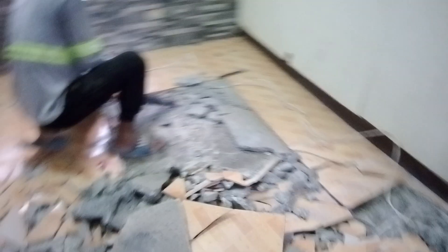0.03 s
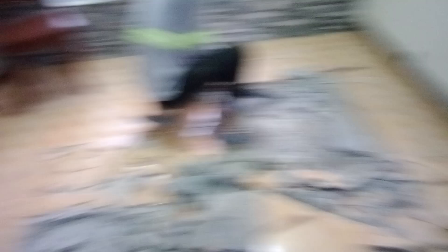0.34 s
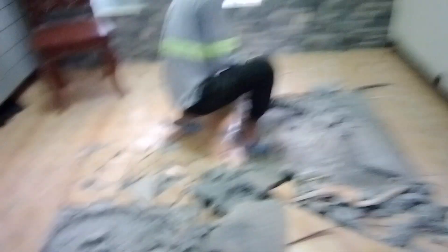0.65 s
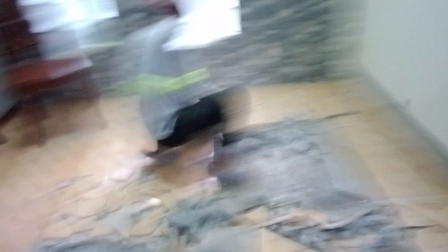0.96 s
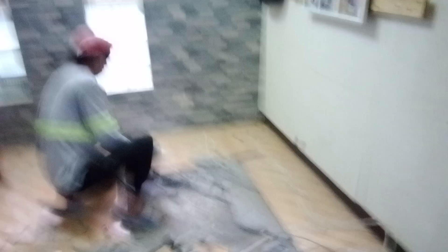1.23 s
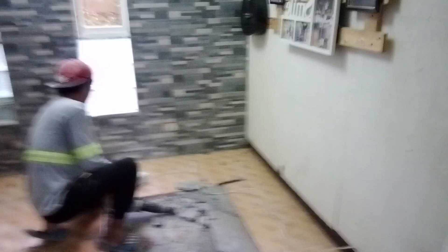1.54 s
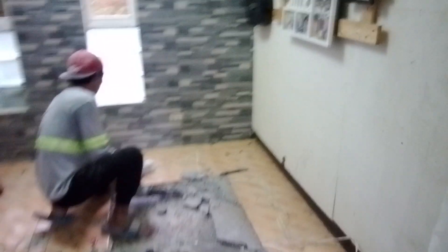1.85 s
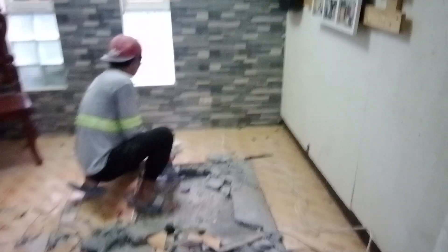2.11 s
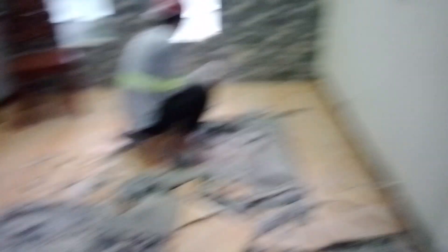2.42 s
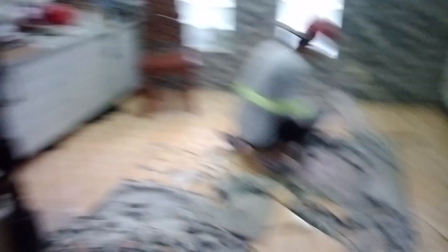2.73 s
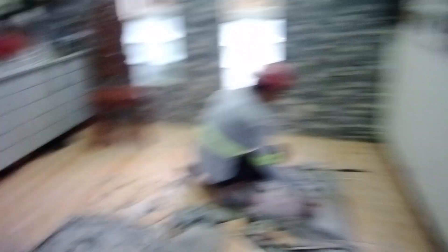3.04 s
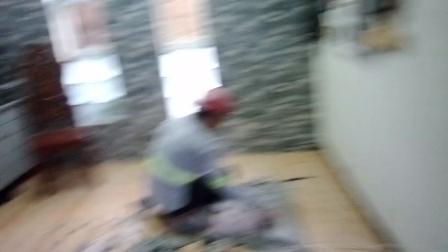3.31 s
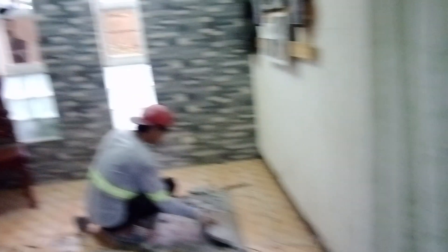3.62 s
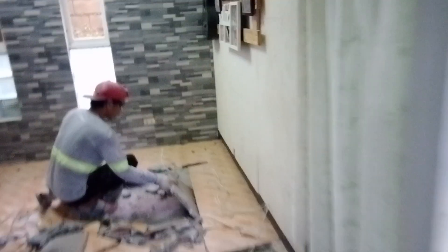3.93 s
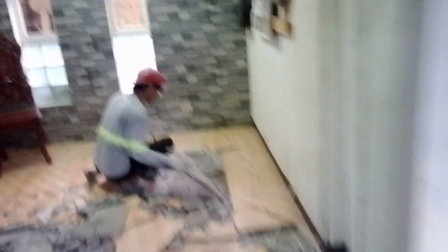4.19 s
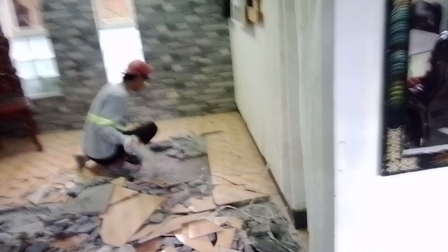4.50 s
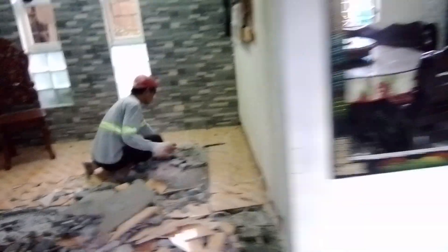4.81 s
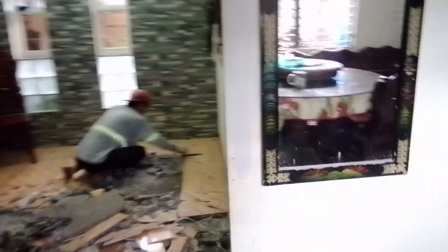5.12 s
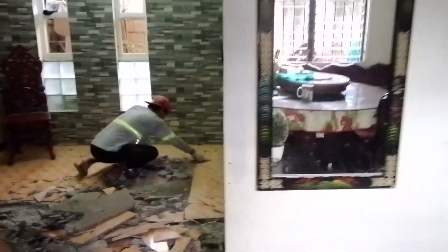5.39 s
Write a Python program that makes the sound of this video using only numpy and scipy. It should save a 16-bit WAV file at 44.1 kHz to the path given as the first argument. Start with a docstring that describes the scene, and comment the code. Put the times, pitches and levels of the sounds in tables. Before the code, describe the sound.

A power hammer clatters in a bare room, slows and fades, before a tossed piece of tile and mortar smashes apart.

```python
"""An electric chipping hammer runs off the floor in a bare tiled room: gears clatter, the fan rushes,
the loose striker knocks once a crank turn and the chisel rings. After a second it is switched off and
coasts down, while fingers rub and bump the hand-held phone. Near five seconds a slab of old tile and
mortar is tossed on the rubble: an edge touches twice, then it lands flat and shatters. The phone's
limiter ducks for the crash, the pieces shower down and a last shard scrapes as it settles."""
import sys
import numpy as np
from scipy import signal
from scipy.fft import rfft, irfft, next_fast_len
from scipy.io import wavfile
from scipy.ndimage import uniform_filter1d, minimum_filter1d, map_coordinates

SR = 44100
rng = np.random.default_rng(int(sys.argv[2]) if len(sys.argv) > 2 else 0)


def unload_wav(signal):
    """Save mono or channel-first audio to the path in sys.argv[1] as 16-bit WAV at rate SR, clipped to [-1, 1]."""
    wavfile.write(
        sys.argv[1],
        SR,
        np.round(np.clip(np.atleast_2d(signal).T, -1, 1) * 32767).astype(np.int16),
    )


N = 240565
TIME = np.arange(N) / SR

# decay of the tiled room: freq_hz, t60_s
ROOM_DECAY = [(100, 0.18), (400, 0.1), (1000, 0.3429), (2500, 0.39), (5000, 0.35), (8000, 0.08),
              (12000, 0.54)]
# colour of the room tone: freq_hz, relative_db
AIR_COLOUR = [(25, -17), (48, -7), (70, 3.5), (150, 1), (500, 4.5), (1000, 4), (3400, 8), (4300, -6),
              (5000, -17.5), (6300, -30.5), (8000, -35.5), (15000, -47.5)]

# the palm dragging on the case and the grip's soft bumps: start_s, level_db, length_s
PALM_DRAGS = [(1.09, -45, .2), (1.5, -53, 0.14), (1.84, -47.5, .07), (3.27, -51, 0.14)]
GRIP_BUMPS = [(2.65, -48.5, 0.072), (4.17, -51.5, 0.17), (4.38, -63, 0.22), (5.2, -56, 0.16),
              (5.4, -63, .06)]
# fingers creaking on the case: start_s, relative_db, pitch_hz
FINGER_CREAKS = [(1.744, -25, 790), (1.83, -29, 766), (1.885, -21, 853), (1.955, -26, 742),
                 (2.074, -25.5, 738), (2.188, -24.5, 754), (2.332, -26.5, 752), (2.649, -27.5, 752),
                 (2.682, -25, 863)]

# the slab's two edge touches and its flat landing: start_s, strength_db, thud_offset_db
SLAB_BLOWS = [(4.797, -23.5, -2.5), (4.809, -21, 5.5), (4.8675, 4.5, -11), ]
# colours of breaking mortar, the slab's thud and the finest splinters: freq_hz, relative_db
CRACK_COLOUR = [(180, -36), (300, -27.5), (420, -3.5), (511, -4), (833, -7), (985, -11), (1320, -8),
                (1610, -7), (1930, -5.5), (2350, -6.5), (3620, -5.5), (5360, -22), (8500, -56.5),
                (11000, -85), (18700, -120)]
THUD_COLOUR = [(40, -36), (70, -15), (130, -2.5), (170, -8), (250, -2.5), (330, -2), (430, 6.5), (520, -1),
               (850, -3.5), (1400, -15), (4000, -73), (8000, -120)]
SPLINTER_COLOUR = [(4000, -19), (6000, 4), (7500, -1), (9000, -30), (13000, -13.5), (15000, -14.5),
                   (15700, -12)]
# ringing modes of the tile pieces: pitch_hz, relative_db, t60_s
TILE_MODES = [(454, -11, .15), (749, -1, 0.13), (853, -7, 0.18), (1316, 2, 0.15), (1640, -12.5, .15),
              (2124, -6, 0.18), (3624, 6, 0.22), (3700, 2, 0.27), (4200, -16, 0.18), (4753, -10.5, 0.16),
              (5550, -20, 0.37)]

# resonances of the loose chisel: pitch_hz, width_hz, relative_db
CHISEL_MODES = [(1540, 38, -26), (2109, 43, -25), (3600, 75, -22), (4303, 240, -24), (4850, 370, -33),
                (5330, 220, -39)]
# clearest rings of the chisel and the housing, the last as the slowing gear whine passes a resonance near 740
# Hz: start_s, level_db, pitch_hz, length_s
CHISEL_RINGS = [(0, -29.5, 1810, .48), (.98, -31, 3635, 0.34), (1.139, -34, 4400, 0.12),
                (2.779, -40, 2124, 0.22), (3.359, -56.5, 743, 0.43)]
# resonances of the gear housing: pitch_hz, width_hz, relative_db
HOUSING_MODES = [(1734, 110, -13), (1974, 150, -5.5), (3230, 27, -9.5), (3770, 46, -7), (6260, 120, 8)]
# tones of the running hammer: crank_multiple, relative_db
CRANK_TONES = [(1, -53), (2, -48), (3, -46.5), (4, -44.5), (5, -37.5), (6, -45), (8, -38.5), (12, -34),
               (16, -33.5), (41, -19.5)]
# the hammer's volume envelope: time_s, relative_db
HAMMER_FADER = [(0, -19.5), (.15, -22), (1.27, -22), (2.37, -26), (4.06, -41.5), (4.76, -47)]
# colours of the hammer at full speed, slowing, nearly stopped, and of its top hiss: freq_hz, relative_db
FAST_COLOUR = [(65, -66), (110, -32.5), (299, -26), (340, -19.5), (438, -18), (799, -10), (875, -13.5),
               (1190, -9.5), (1750, 0.5), (2210, -4.5), (3360, 2), (3960, -2), (5110, -22.5), (6350, -29.5),
               (8500, -61.5), (11000, -93), (18700, -120)]
SLOWING_COLOUR = [(65, -69.5), (110, -37.5), (224, -23), (294, -17.5), (471, -20.5), (608, -10),
                  (1050, -12.5), (1480, -2), (2090, -0.5), (2650, -2), (3010, 1), (4030, -2.5), (4750, -18),
                  (6350, -30), (8500, -55.5), (11000, -87.5), (18700, -120)]
SLOW_COLOUR = [(40, -38), (70, -25), (150, -16), (300, -11), (500, -11), (750, -9.5), (1000, -14),
               (1400, -6.5), (1800, -4), (2400, -4), (3100, -1), (4100, -9), (4700, -21.5), (6000, -29),
               (8000, -54.5), (15000, -86)]
HISS_COLOUR = [(6000, -40), (8500, -14.5), (12000, -9.5), (14000, -3.5), (15000, 7.5), (15700, -1)]


def amp(db):
    """Decibels to gain."""
    return 10 ** (np.asarray(db) / 20)


def unit(x):
    """Scaled to rms 1."""
    return x / np.sqrt(np.mean(x ** 2) + 1e-20)


def along(points, hz):
    """(freq_hz, value) points read on a log frequency axis."""
    freqs, values = np.transpose(points)
    return np.interp(np.log(hz + 1), np.log(freqs + 1), values)


def noise():
    """Fresh white noise."""
    return rng.standard_normal(N)


def add(track, start_s, sound):
    """Mix a sound into the track."""
    part = track[max(round(start_s * SR), 0):][:len(sound)]
    part += sound[:len(part)]


def filtered(x, response):
    """x shaped by a response that is a function of frequency."""
    size = next_fast_len(N + SR // 2)
    return irfft(rfft(x, size) * response(np.fft.rfftfreq(size, 1 / SR)), size)[:N]


def coloured(x, colour):
    """x through an EQ of unit energy, minimum phase so nothing rings ahead of a hit."""
    size = 8192
    cepstrum = irfft(np.log(amp(along(colour, np.fft.rfftfreq(size, 1 / SR)))))
    cepstrum[1:size // 2] *= 2
    cepstrum[size // 2 + 1:] = 0
    kernel = irfft(np.exp(rfft(cepstrum)))
    return signal.fftconvolve(x, kernel / np.linalg.norm(kernel))[:N]


def resonance(f, hz, width_hz):
    """Response of one damped resonance, 1 at its peak."""
    return 1j * f * width_hz / (hz * hz - f * f + 1j * f * width_hz)


def noise_band(hz, width_hz, count):
    """Up to half a second of noise around hz, rms 1."""
    f = np.fft.rfftfreq(SR // 2, 1 / SR)
    spectrum = rfft(rng.standard_normal(SR // 2)) * resonance(f, hz, width_hz) ** 2
    return unit(irfft(spectrum)[:count])


def swells(rows, hz, width_hz):
    """Short swells of noise around hz from (start_s, level_db, length_s) rows."""
    out = np.zeros(N)
    for start_s, db, length_s in rows:
        count = int(length_s * SR)
        add(out, start_s, amp(db) * np.hanning(count) ** 0.34 * noise_band(hz, width_hz, count))
    return out


def waver(depth_db, rate_hz):
    """A gain that glides between random values."""
    knots = rng.standard_normal(256)
    return amp(depth_db * np.tanh(map_coordinates(knots, [TIME * rate_hz], mode="nearest")))


def in_room(x, wet_db):
    """Direct sound plus the hard walls' tail, which keeps changing as the phone is carried about."""
    hz, t, spectra = signal.stft(rng.standard_normal((12, SR * 3 // 4)), SR, nperseg=256)
    decay = amp(-60 * t / along(ROOM_DECAY, hz)[:, None])
    tails = signal.istft(spectra * decay, SR, nperseg=256)[1]
    hop, predelay_s = SR // 32, .002
    wet = np.zeros(N)
    for i, centre in enumerate(range(0, N + hop, hop)):
        at = np.arange(max(centre - hop, 0), min(centre + hop, N))
        grain = x[at] * np.cos(np.pi / 2 * (at - centre) / hop)
        tail = tails[i % len(tails)]
        if np.abs(grain).max() > 1e-9:
            add(wet, at[0] / SR + predelay_s, signal.fftconvolve(grain, unit(tail) / np.sqrt(len(tail))))
    return (x + amp(wet_db) * wet) / np.hypot(1, amp(wet_db))


def room_tone():
    """A steady bed of quiet air."""
    return amp(-57) * coloured(noise(), AIR_COLOUR)


def handling():
    """The hand on the case: the palm groans, the grip bumps, fingers creak and a fingertip knocks."""
    out = swells(PALM_DRAGS, hz=250, width_hz=39) + swells(GRIP_BUMPS, hz=90, width_hz=126)
    count = int(0.051 * SR)
    press = np.hanning(count) ** 0.24 * np.linspace(1, .5, count)  # each creak starts firm and eases
    for start_s, db, hz in FINGER_CREAKS:
        creak = noise_band(hz, 120, count)
        squeak = amp(-20.5) * noise_band(6300, 280, count)
        add(out, start_s, amp(db - 8) * press * (creak + squeak))
    t = TIME[:SR // 10]
    knock = amp(-40.5) * np.exp(-t / .018) * noise_band(hz=330, width_hz=520, count=len(t))
    add(out, start_s=2.657, sound=knock)
    return out


def debris(start_s, length_s, db, fade_db, count):
    """Pieces land at uneven times and strengths: (start_s, strength_db, thud_offset_db) rows."""
    jitter, strength = rng.random((count, 2)).T
    progress = (np.arange(count) + jitter) / count
    levels_db = db - fade_db * progress ** 2.38 + 4.6 * (2 * strength - 1)
    return [(s, level_db, -11.5) for s, level_db in zip(start_s + length_s * progress, levels_db)]


def tile_clink(t):
    """A struck piece of tile rings in damped modes, each with its own chance level and tuning."""
    variations = rng.normal([0, 1], [2.5, .011], (len(TILE_MODES), 2))
    ring = sum(amp(db + extra_db - 60 * t / t60_s) * np.sin(2 * np.pi * hz * detune * t)
               for (hz, db, t60_s), (extra_db, detune) in zip(TILE_MODES, variations))
    attack = np.tanh(t / 0.00055) ** 2
    return attack * ring


def slab():
    """The slab's edge crumbles, then it shatters; each contact layers crack, splinters, thud and clink."""
    cracks, splinters, thuds, clinks = np.zeros((4, N))
    t = TIME[:SR // 2]
    crumbs = debris(start_s=4.812, length_s=0.05, db=-19, fade_db=-2.5, count=5)
    shower = debris(start_s=4.877, length_s=.33, db=-5, fade_db=38, count=26)
    for start_s, db, thud_db in [*SLAB_BLOWS, *crumbs, *shower]:
        snap, push, grit, chance = rng.standard_normal((4, len(t)))
        crunch = amp(3.5) * grit * (chance > 2.2) * np.exp(-t / .03)
        crack = 2 * np.tanh(snap) * np.exp(-t / .004) + crunch
        crack[0] = 3  # the first hard touch
        spray = crack + 1.3 * grit * np.exp(-t / .055)
        add(cracks, start_s, amp(db) * crack)
        add(splinters, start_s, amp(db) ** 2 * spray)  # only hard blows spray glaze
        add(thuds, start_s, amp(db + thud_db) * push * np.exp(-t / 0.019))
        add(clinks, start_s, amp(-24 + 0.58 * db) * tile_clink(t))  # light pieces mostly clink
    crash = coloured(cracks, CRACK_COLOUR) + coloured(thuds, THUD_COLOUR) + clinks
    return in_room(crash, wet_db=7) + amp(-50.5) * coloured(splinters, SPLINTER_COLOUR)


def shard_scrape():
    """One shard skids briefly as it settles."""
    return swells([(5.14, -31.5, 0.075)], hz=776, width_hz=79)


def crank_speed():
    """Turns per second: the motor runs up, is switched off, and friction and fan drag brake it."""
    start_hz, free_hz, run_up_s, switch_off_s = 65.4, 69, .27, 1.05
    friction, drag = 7.6, .0087  # turns per second squared; per turn
    running = free_hz - (free_hz - start_hz) * np.exp(-TIME / run_up_s)
    balance_hz = np.sqrt(friction / drag)  # the speed at which both brakes are equal
    coast_s = np.maximum(TIME - switch_off_s, 0)
    coasting = balance_hz * np.tan(np.arctan(free_hz / balance_hz) - drag * balance_hz * coast_s)
    return np.maximum(np.minimum(running, coasting), .5)


def chisel(rattle, gain):
    """The rattle rings the loose chisel: its resonances come and go as it shifts, and a few stand out."""
    shimmer = np.zeros(N)
    for hz, width_hz, db in CHISEL_MODES:
        mode = unit(filtered(rattle, lambda f: resonance(f, hz, width_hz) ** 2))
        shimmer += amp(db) * waver(depth_db=7, rate_hz=9) * mode
    rings = sum(swells([(start_s, db, length_s)], hz, width_hz=hz / 20)
                for start_s, db, hz, length_s in CHISEL_RINGS)
    return gain * shimmer + rings


def housing(rattle):
    """The gear housing resonates; each mode comes and goes as the grip on it shifts."""
    out = np.zeros(N)
    for hz, width_hz, db in HOUSING_MODES:
        mode = filtered(rattle, lambda f: resonance(f, hz, width_hz))
        out += amp(db) * waver(depth_db=8.2, rate_hz=9.6) * mode
    return out


def crank_whine(turns):
    """Harmonics of the crank, wavering as the phone moves through the room's standing waves."""
    out = np.zeros(N)
    for multiple, db in CRANK_TONES:
        gain = amp(db) * waver(depth_db=3.7, rate_hz=9)
        out += gain * np.sqrt(2) * np.sin(2 * np.pi * (multiple * turns + rng.random()))
    return out


def striker(turns, speed, pace):
    """The loose striker knocks once a turn: a noise burst of uneven strength."""
    since_knock_s = (turns - .5) % 1 / speed
    knock_db = 2 * rng.uniform(-0.38, 1, int(turns[-1]) + 2)
    strength = amp(knock_db)[(turns + .5).astype(int)]
    return unit(noise() * strength * np.exp(-since_knock_s / 0.0091) * pace ** -.25)


def gear_clatter(turns, backlash, teeth):
    """One click per tooth; each tooth has its own strength and the backlash varies it."""
    tooth = np.floor(turns * teeth).astype(int)
    at = np.flatnonzero(np.diff(tooth))
    wear = rng.standard_normal(teeth)
    clicks = np.zeros(N)
    clicks[at] = wear[tooth[at] % teeth] + backlash * rng.standard_normal(len(at))
    load = 1 + 0.28 * np.cos(2 * np.pi * (turns - .56))  # the piston loads the gears once a turn
    return load * unit(clicks / np.sqrt(np.gradient(turns)))


def hammer():
    """Gears and striker follow the crank over the fan's rush; the sound dulls and fades as it coasts."""
    speed = crank_speed()
    pace = speed / speed.max()
    turns = np.cumsum(speed) / SR
    knocks = amp(-1.5) * striker(turns, speed, pace)
    gears = gear_clatter(turns, backlash=2.7, teeth=41)
    fan = amp(3) * noise()
    works = gears + knocks + fan
    rattle = in_room(works + pace * housing(works), wet_db=1.5)
    # the crank speed crossfades three colours
    fast = np.clip((speed - 55) / 13, 0, 1)
    slow = np.clip((30 - speed) / 14, 0, 1)
    blend = (fast, FAST_COLOUR), (1 - fast - slow, SLOWING_COLOUR), (slow, SLOW_COLOUR)
    body = sum(share * unit(coloured(rattle, colour)) for share, colour in blend)
    whine = pace ** 0.89 * crank_whine(turns)
    hiss = pace ** 0.64 * amp(-41.5) * unit(coloured(rattle, HISS_COLOUR))
    fader_db = np.interp(TIME, *np.transpose(HAMMER_FADER))
    last_turns_db = -24 * np.maximum(TIME - HAMMER_FADER[-1][0], 0)
    machine = amp(fader_db + last_turns_db - 1.24) * (body + whine + hiss)
    return machine + chisel(rattle, gain=amp(fader_db) * pace)


def scene():
    """Hammer and slab up front, handling and room tone beneath, in mono."""
    return (hammer() + slab() + shard_scrape() + handling() + room_tone())[None]


def limiter(x, ceiling_db, release_db_per_s):
    """The gain ducks a moment ahead of a peak and recovers at a steady rate."""
    ahead = SR // 90
    over_db = np.maximum(20 * np.log10(np.abs(x) + 1e-9) - ceiling_db, 0)
    needed_db = -minimum_filter1d(-over_db, ahead, origin=-(ahead // 2))
    release_db = release_db_per_s * TIME
    cut_db = np.maximum.accumulate(needed_db + release_db) - release_db
    return x * amp(-uniform_filter1d(cut_db, size=64))


def record(dry):
    """The phone limits peaks and cuts off the very top of the treble."""
    limited = limiter(dry[0], ceiling_db=-7, release_db_per_s=30)
    return filtered(limited, lambda hz: hz < 15750)[None]


dry = scene()
out = record(dry)
unload_wav(out)
```